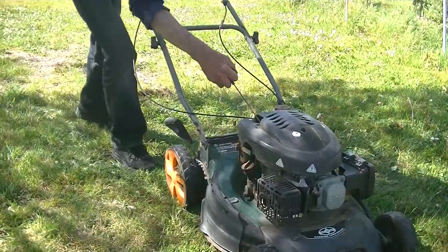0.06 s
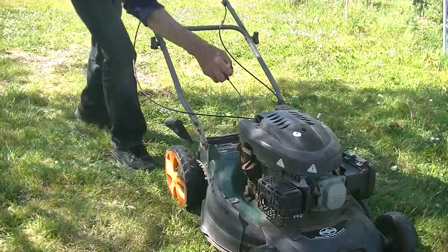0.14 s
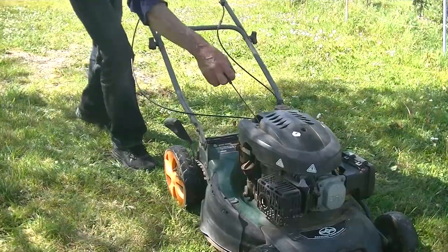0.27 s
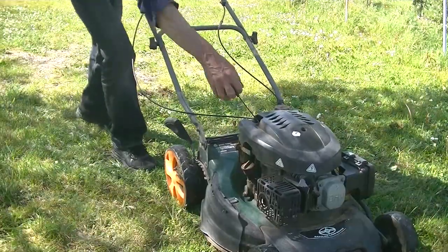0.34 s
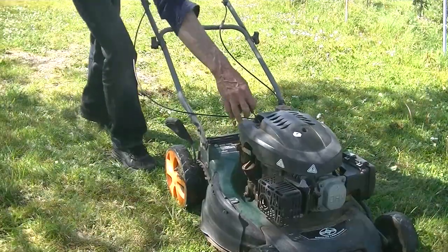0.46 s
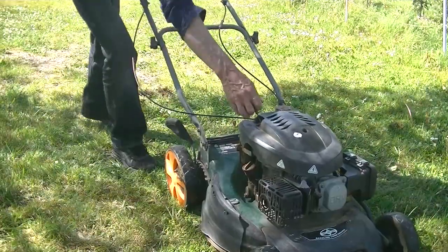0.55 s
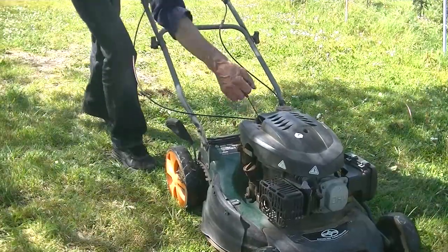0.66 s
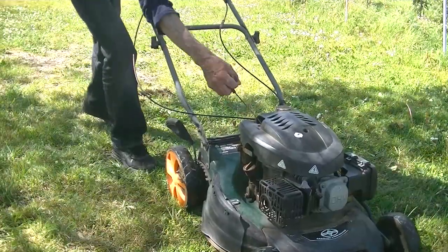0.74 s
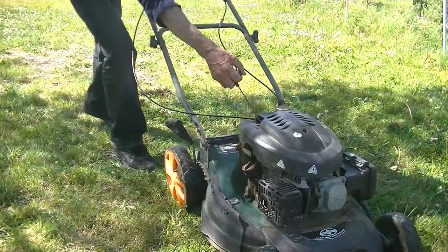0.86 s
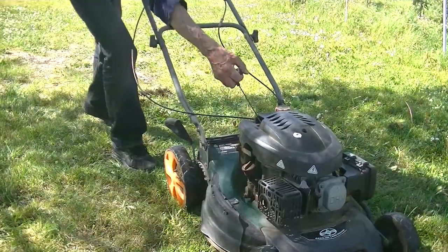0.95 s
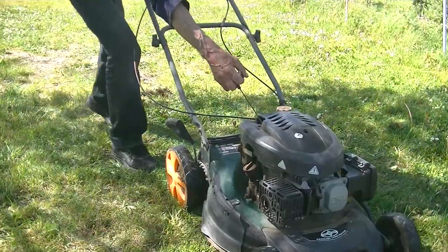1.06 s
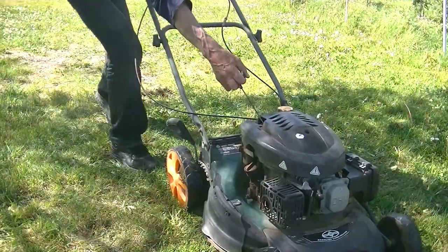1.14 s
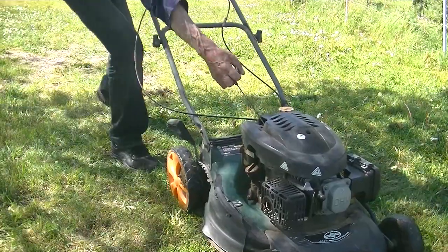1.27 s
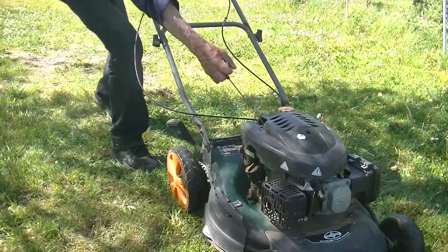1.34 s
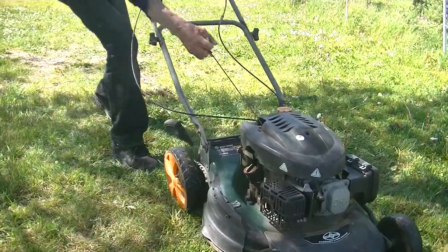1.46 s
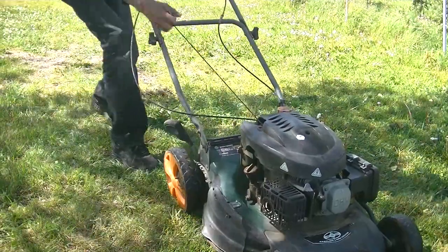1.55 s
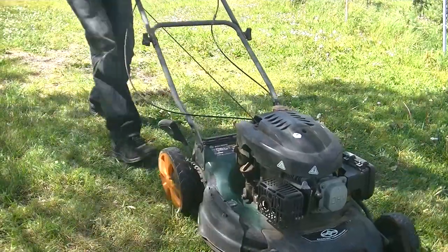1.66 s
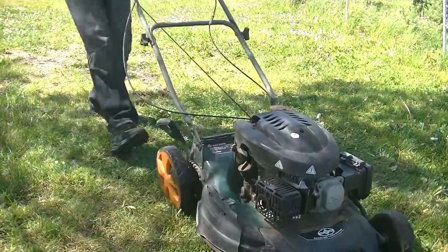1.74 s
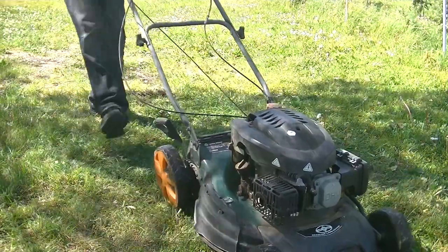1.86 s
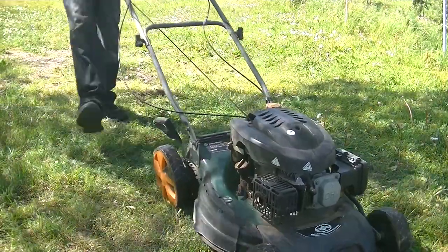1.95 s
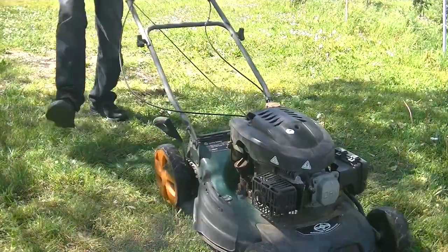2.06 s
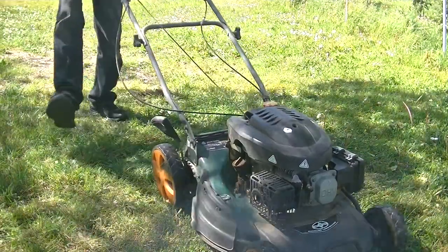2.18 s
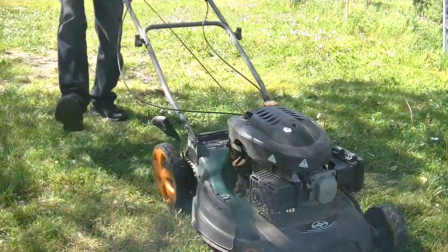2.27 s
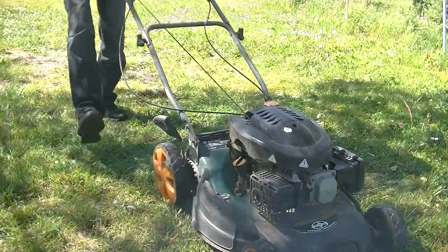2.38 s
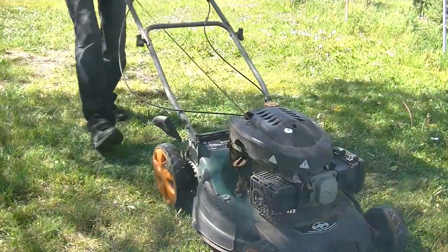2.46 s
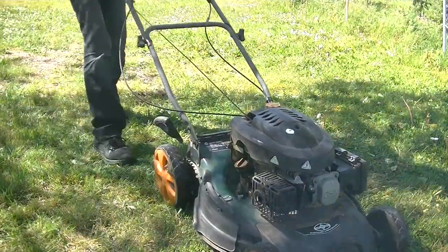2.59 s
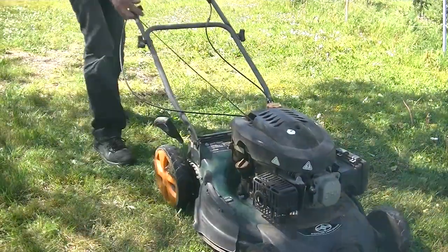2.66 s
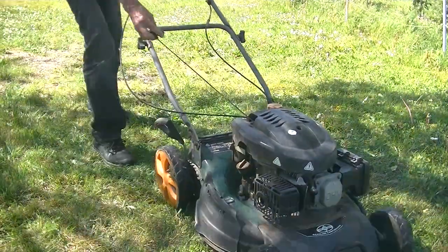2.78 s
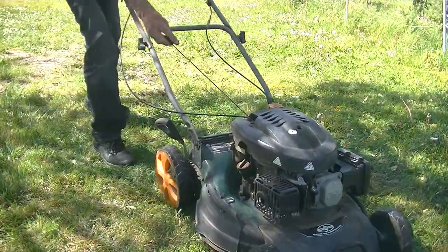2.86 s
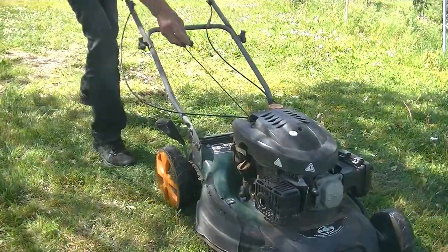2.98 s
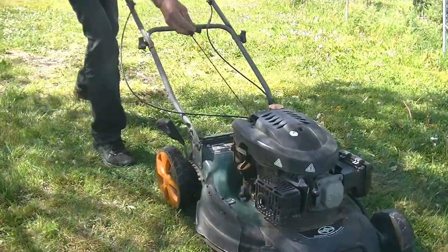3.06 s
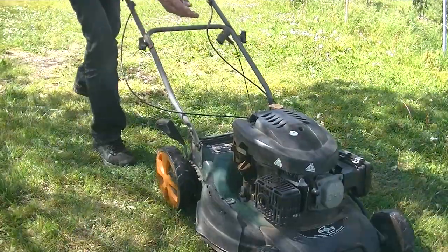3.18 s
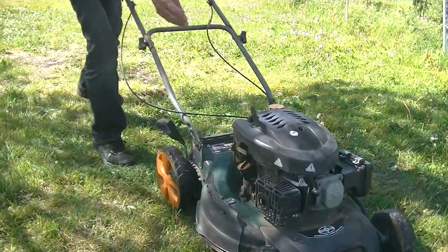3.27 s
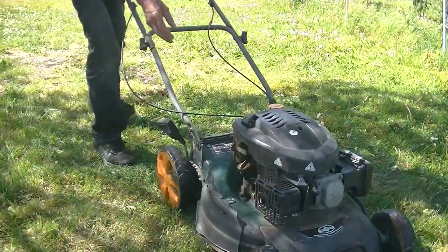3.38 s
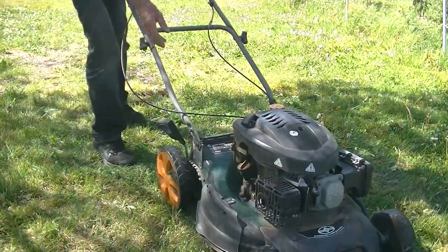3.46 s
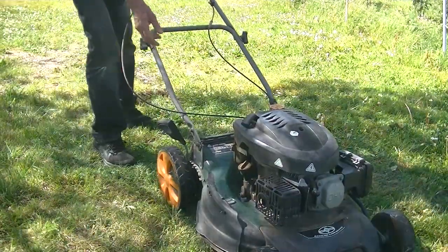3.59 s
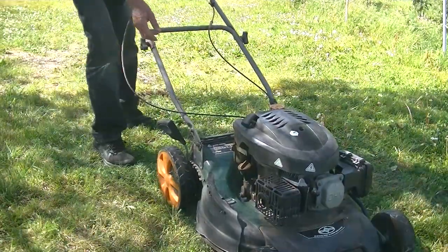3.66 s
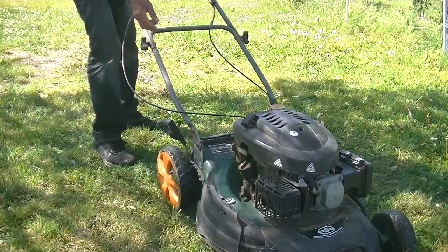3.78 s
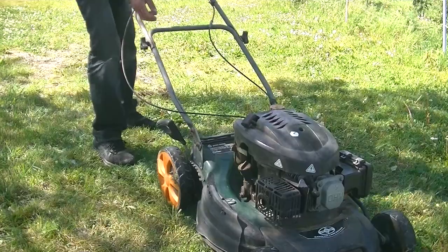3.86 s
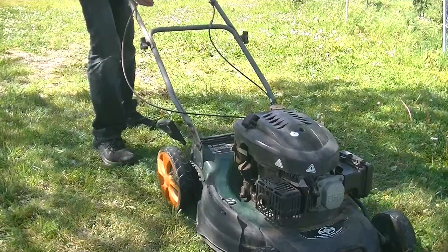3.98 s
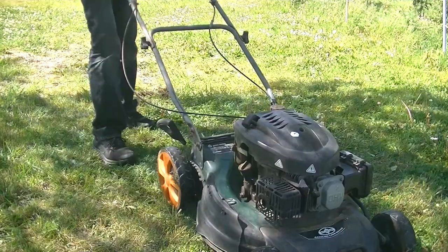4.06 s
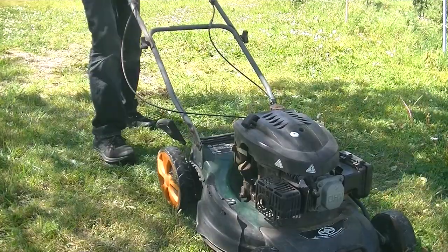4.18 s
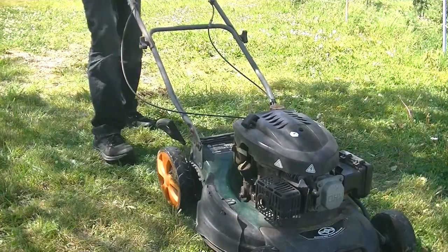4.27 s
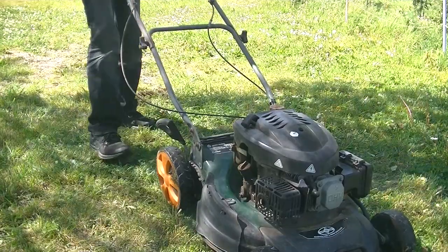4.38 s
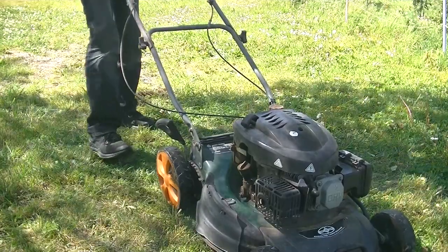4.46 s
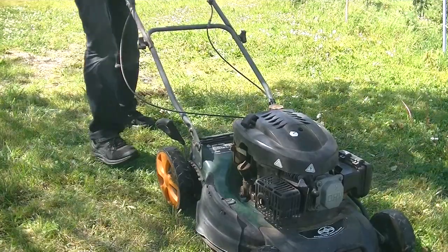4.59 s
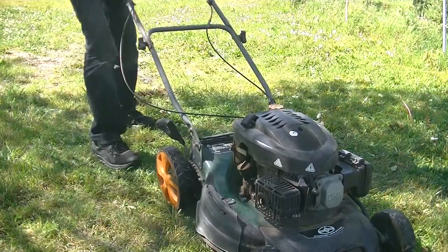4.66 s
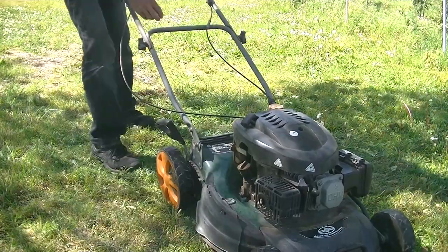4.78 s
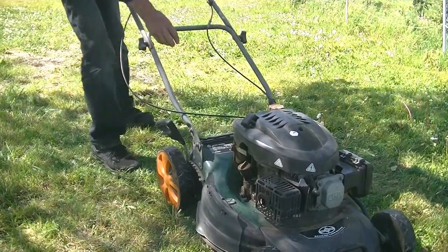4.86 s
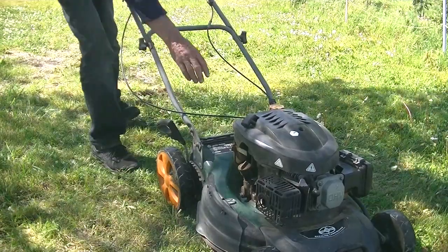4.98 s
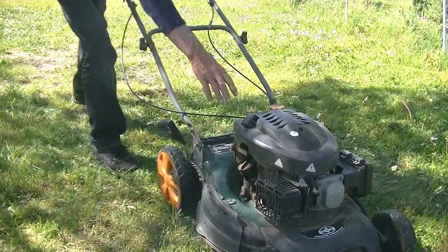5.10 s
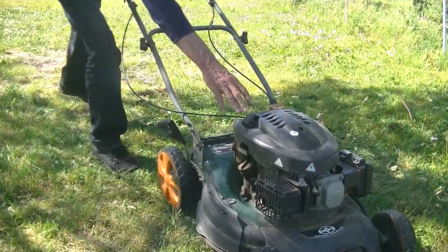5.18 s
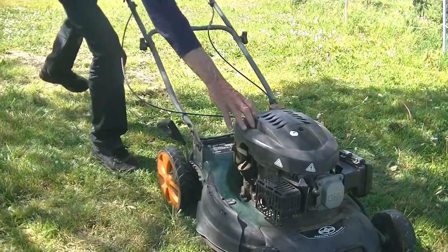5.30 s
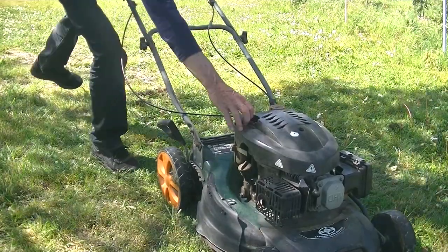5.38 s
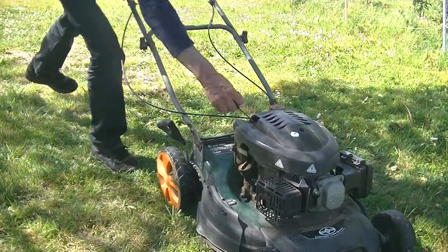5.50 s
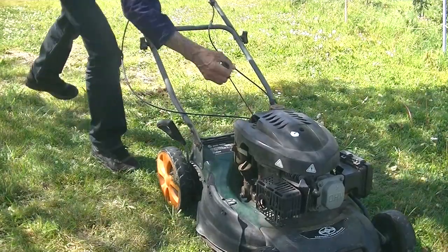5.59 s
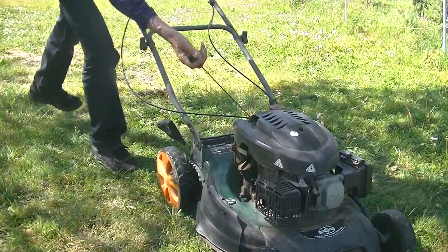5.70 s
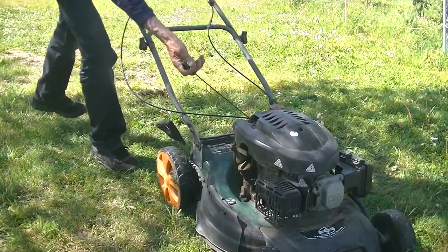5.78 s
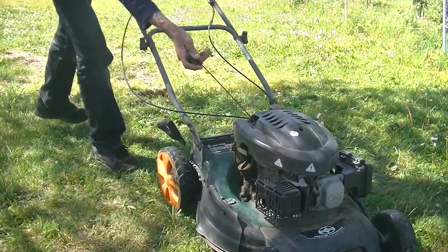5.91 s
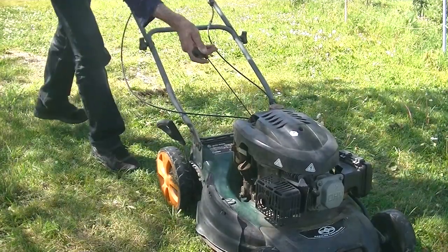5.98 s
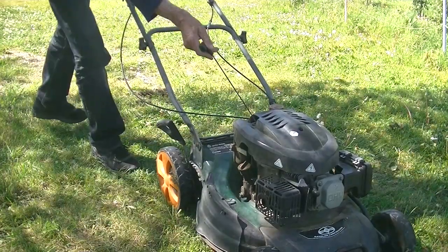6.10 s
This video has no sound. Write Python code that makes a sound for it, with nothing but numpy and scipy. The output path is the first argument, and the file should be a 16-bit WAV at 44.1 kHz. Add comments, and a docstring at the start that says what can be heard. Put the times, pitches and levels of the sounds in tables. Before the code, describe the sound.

A petrol lawn mower is started on a lawn, a couple of metres from the microphone. The starter clicks lightly, then the cord whizzes out and the engine catches, speeds up, stumbles briefly and settles into a fast, even beat with a metallic drone and clatter. The cord's handle slaps the frame, and near the end the spool gives a few high squeals over the running engine.

```python
"""A single-cylinder petrol lawn mower is pull-started on a lawn, a couple of metres away.
The starter's pawls (small catches) click as the slack is taken up, and the cord whizzes out. The engine
coughs, catches and settles at twenty firings a second: gas puffs boom through the muffler, the steel
deck over the blade drones, and each firing clacks. The spool rubs and squeals as the cord runs back in.
Behind it all is the faint hiss of the garden."""
import sys
import numpy as np
from scipy import signal
from scipy.fft import rfft, irfft, next_fast_len
from scipy.io import wavfile

SR = 44100
rng = np.random.default_rng(int(sys.argv[2]) if len(sys.argv) > 2 else 0)


def transcribe(u):
    """Save the signal u as a 16-bit wav file named by the first command-line argument.

    u: samples, shape (n,) or (channels, n), limited to [-1, 1]; the rate is SR.
    q: integer samples, one column per channel.
    """
    v = np.clip(np.atleast_2d(u).T, -1, 1)
    q = np.round(v * 32767).astype(np.int16)
    wavfile.write(sys.argv[1], SR, q)


N = 270893
T = np.arange(N) / SR

# how fast the engine runs; one cycle is two turns and one firing: (time [s], speed [cycles per s])
SPEED = [(1.4, 0), (1.785, 8.93), (1.884, 11.29), (2.183, 17.78), (2.362, 19.79), (3.427, 20.09),
         (5.806, 20.53)]
# notes at which the engine's cover and block ring: (pitch [Hz], width [Hz], level [dB])
COVER_NOTES = [(1142, 90, -4.5), (1573, 100, -0.5), (2545, 64, 0.5), (3450, 35, 1.5), (5227, 153, 5),
               (6440, 52, 4), (7610, 11, 9), (8080, 17, 10)]

CATCH_S = 1.785  # the first firing
MISFIRES = [10, 12, 14, 16]  # these cycles barely fire, as the throttle closes


def amp(db):
    """Turn decibels into a gain."""
    return 10 ** (np.asarray(db) / 20)


def unit(x):
    """Scale a signal to an average (rms) size of 1."""
    return x / np.sqrt(np.mean(x ** 2) + 1e-20)


def white():
    """Fresh white noise: an even hiss."""
    return rng.standard_normal(N)


def drift(per_s):
    """A random wobble of about size 1 that takes a new value per_s times a second."""
    return unit(np.interp(T * per_s, np.arange(N // 40), rng.standard_normal(N // 40)))


def in_time(rows):
    """Join a table's points in time with straight lines: one curve for each value column."""
    times, *columns = np.transpose(rows)
    return [np.interp(T, times, column) for column in columns]


def at_hz(points, hz):
    """Read between a table's frequencies, with every octave equally wide."""
    known, value = np.transpose(points)
    return np.interp(np.log(np.maximum(hz, 1)), np.log(known), value)


def colour(x, spectrum, size=8192):
    """Give a sound the tone of a (frequency [Hz], level [dB]) table; white noise keeps its level."""
    gain = unit(amp(at_hz(spectrum, np.fft.rfftfreq(size, 1 / SR))))
    cepstrum = irfft(np.log(gain))
    # fold it so that the filter rings only after a hit, never before (minimum phase)
    cepstrum[1:size // 2] *= 2
    cepstrum[size // 2 + 1:] = 0
    response = irfft(np.exp(rfft(cepstrum)))
    return signal.oaconvolve(x, response)[:N]


def resonate(x, hz, width):
    """Let through a band around one pitch; the narrower it is, the longer it rings."""
    r = np.exp(-np.pi * width / SR)
    feed = np.array([1, 0, -1]) * (1 - r * r) / 2
    feedback = [1, -2 * r * np.cos(2 * np.pi * hz / SR), r * r]
    return signal.lfilter(feed, feedback, x + 1e-18)


def ring(x, hz, width):
    """Ring at one pitch, boosted so that white noise keeps its level."""
    return resonate(x, hz, width) * np.sqrt(SR / (np.pi * width))


def housing(x, notes):
    """A housing adds its own ringing notes to whatever rattles inside."""
    return x + sum(amp(db) * resonate(x, hz, width) for hz, width, db in notes)


def bursts(times, levels_db, rise_s, decay_s):
    """Noise that swells up to each hit and dies away after it."""
    power = np.zeros(N)
    for s, db in zip(times, levels_db):
        end = s + min(8 * decay_s + .01, .1)
        near = slice(max(int((s - .02) * SR), 0), max(int(end * SR), 0))
        age = T[near] - s
        power[near] += (amp(db) * np.exp(np.minimum(age / rise_s, -age / decay_s))) ** 2
    return np.sqrt(power) * white()


def engine_cycles():
    """Cycles run since the first firing, at every sample."""
    speed, = in_time(SPEED)
    return np.cumsum(speed * (T > CATCH_S)) / SR


def cycle_times(share):
    """The moments when the engine is a given share through its cycle; 0 is the firing."""
    cycles = engine_cycles()
    return T[np.searchsorted(cycles, np.arange(share, cycles[-1], 1), side="right")]


def at_speed(full_db, power):
    """Level in dB of a part that grows with engine speed, more steeply for a higher power."""
    speed, = in_time(SPEED)
    return full_db + power * 20 * np.log10(speed / speed.max() + 1e-6)


def throttle(s, ease_at_s=2.32, close_s=.068):
    """1 (wide open) while the engine speeds up, falling to 0 as its speed governor eases it back."""
    return np.exp(-np.maximum(s - ease_at_s, 0) / close_s)


def settling(s, db, open_db, fade_db_per_s):
    """A level in dB that is higher at open throttle and sinks slowly as the engine runs on."""
    return db + open_db * throttle(s) - fade_db_per_s * np.maximum(s - CATCH_S, 0)


def lull():
    """A gain that drops just after each firing and builds up towards the next."""
    cycles = engine_cycles()
    depth_db = settling(T, 6.5, open_db=9.5, fade_db_per_s=.74) * np.minimum(cycles / 2, 1)
    dip = np.exp(-((cycles % 1 - .17) / .14) ** 2)
    return amp(depth_db * (.2 - dip))


def friction(repeat_share):
    """Rubbing noise; once the engine runs, a share of it comes back alike in every cycle."""
    pattern = rng.standard_normal(SR // 20)
    place = (engine_cycles() % 1 * len(pattern)).astype(int)
    running = np.sqrt(repeat_share) * pattern[place] + np.sqrt(1 - repeat_share) * white()
    return np.where(T > CATCH_S, running, white())


def garden():
    """A faint, steady outdoor hiss, a little different in each ear."""
    # tone of the hiss: (frequency [Hz], level [dB])
    hiss_tone = [(18, -61), (30, -31), (90, -30), (127, -16.5), (280, -5), (311, -3), (632, -4.5),
                 (702, -6), (1350, -5.5), (2900, 2), (5590, -8), (6720, -11), (9220, -17), (14000, -28.5),
                 (16000, -22)]
    middle = colour(white(), hiss_tone)
    sides = amp(-7.5) * colour(white(), hiss_tone) * [[1], [-1]]
    return amp(-62.5) * (middle + sides)


def pawls(scatter_db=6, chatter_knock_db=-24, chatter_tick_db=-2.5):
    """The starter's catches drop into their cup: a ringing click, a hollow knock and a bright tick."""
    # clear clicks: (time [s], level [dB], knock offset [dB], tick offset [dB])
    clear_clicks = [(0.071, -36.5, -8, -35), (0.129, -37, -13, -32), (0.198, -40, -9, -30),
                    (0.303, -37, -30, -13), (0.759, -28, -35, 2.5), (0.764, -34, -45, -20),
                    (0.836, -40, -5, -35), (1.123, -41.5, -21, -22), (1.218, -44.5, -24, -27),
                    (1.379, -39.5, -14, -28), (1.652, -28.5, -24, -24), (1.671, -26, -13.5, -29),
                    (1.74, -27, -29, -9), (1.761, -19, -20, -16), (1.816, -24, -24, -25),
                    (1.87, -23, -26, 0)]
    # lighter chatter in between: (start [s], end [s], rate [clicks per s], level [dB])
    chatter = [(0.362, .4, 28, -47.5), (.712, .745, 53, -38.5), (0.982, 1.35, 17.2, -51.5),
               (1.702, 1.73, 55, -33.5), (1.826, 1.915, 87, -30.5)]
    # tone of a click: (frequency [Hz], level [dB])
    click_tone = [(100, -50), (220, -25), (380, -4.5), (650, -15.5), (1100, -6.5), (1600, -6.5), (2600, 0),
                  (3700, 0.5), (4800, -1), (5800, -14.5), (6800, -7), (9000, -36), (14000, -30)]
    # notes at which the cup rings: (pitch [Hz], width [Hz], level [dB])
    cup_notes = [(1597, 91, 10), (2175, 240, 0.5), (3760, 120, 4.5), (4270, 180, 4)]
    clicks = list(clear_clicks)
    for start, end, per_s, db in chatter:
        chance = rng.uniform(-1.04, 1, size=(16, 2))
        for s, (early, strong) in zip(np.arange(start + .5 / per_s, end, 1 / per_s), chance):
            when = s - .25 * early / per_s
            clicks.append((when, db + scatter_db * strong, chatter_knock_db, chatter_tick_db))
    times, db, knock_db, tick_db = np.transpose(clicks)
    click = bursts(times + .0011, db - 9, rise_s=.0011, decay_s=.0064)
    tail = bursts(times + .008, db - 23, rise_s=.0025, decay_s=.024)
    knock = bursts(times + .0025, db + knock_db - 2.5, rise_s=.00075, decay_s=.0088)
    knock = resonate(ring(knock, hz=1130, width=100), hz=1200, width=1400)
    tick = bursts(times + .00082, db + tick_db - 15.5, rise_s=.00056, decay_s=.011)
    tick = colour(tick, [(300, -71), (3000, -14), (7000, 9), (10000, -3), (15000, -18)])
    return housing(colour(click + tail, click_tone), cup_notes) + knock + tick


def spool_squeal(build_s=.015, flutter_db=2.5, ring_periods=115, slips_per_s=52):
    """The cord's spool sticks and slips: each slip screeches, and its notes build up and ring on."""
    # when the spool rubs: (start [s], end [s], level [dB])
    rubs = [(0.731, 0.742, -47), (1.903, 1.954, -35), (3.33, 3.355, -43.5), (5.51, 5.569, -34.5),
            (5.61, 5.697, -36), (5.728, 5.761, -35), (6.06, 6.084, -36.5)]
    # narrow notes at which it sings: (pitch [Hz], width [Hz], level [dB])
    singing_notes = [(2718, 10, -3), (2880, 10, 0), (2968, 20, -6), (3128, 14, -2), (6732, 30, -8),
                     (6847, 12, -8), (9678, 14, -9)]
    # broad notes set off by each slip: (pitch [Hz], width [Hz], level [dB])
    screech_notes = [(3120, 150, -23), (6570, 180, -3), (9550, 160, -11), (9620, 230, -5),
                     (13020, 160, -11.5), (14500, 540, -17)]
    rubbing = sum(amp(db) * ((T > start) & (T < end)) for start, end, db in rubs)
    drive = sum(amp(db) * np.clip((T - start) / build_s, 0, 1) * (T < end) for start, end, db in rubs)
    song, log_drive = 0, np.log(drive + 1e-9)
    for hz, width, db in singing_notes:
        fall = T * hz / ring_periods  # low notes ring longest
        held = np.exp(np.maximum.accumulate(log_drive + fall) - fall)  # follows the rub, then fades
        wander = np.cumsum(white()) * np.sqrt(2 * np.pi * width / SR)  # makes the note less pure
        song += held * amp(db + flutter_db * drift(90)) * np.sin(2 * np.pi * hz * T + wander)
    slips = np.cumsum(rng.uniform(.4, 1.3, size=600)) / slips_per_s
    first_slips = np.array(rubs)[:, 0] + .002  # every rub breaks loose with a slip
    slips = np.append(slips[slips < T[-1]], first_slips)
    scrape = rubbing * bursts(slips, rng.normal(3.5, 2, len(slips)), rise_s=.0005, decay_s=.007)
    screech = sum(amp(db) * resonate(ring(scrape, hz, width), hz, 3 * width)
                  for hz, width, db in screech_notes)
    return amp(-2) * song + amp(-4) * screech


def thumps(kick_db=-42.5, misfire_db=-38, misfire_lag_s=.01):
    """The starter, the first three firings and the misfires shake a low note out of the deck."""
    # low thumps as the starter catches and the pull turns the engine over: (time [s], level [dB])
    starter_thumps = [(0.762, -49.5), (1.602, -52), (1.742, -41)]
    fired = cycle_times(0)
    kicks = [(s, kick_db) for s in fired[:3]]
    stumbles = [(s + misfire_lag_s, misfire_db) for s in fired[MISFIRES]]
    times, db = np.transpose(list(starter_thumps) + kicks + stumbles)
    shake = bursts(times, db, rise_s=.002, decay_s=.009)
    thud = colour(shake, [(40, -25), (130, -26), (235, 3.5), (330, 14.5),
                          (500, -9), (900, 9), (2500, -39)])
    note = resonate(ring(shake, hz=249, width=70), hz=248, width=170)
    return amp(-4.5) * thud + amp(-6.5) * note


def cranking_puffs(start_s=1.428, gap_s=.05, first_db=-54, step_db=1):
    """Three short puffs, each a little stronger, as the pull first turns the engine over."""
    # tone of a puff: (frequency [Hz], level [dB])
    puff_tone = [(120, -33), (230, -12), (340, 6), (550, -3.5), (900, 0.5), (1500, -10), (3000, -30)]
    k = np.arange(3)
    puffs = bursts(start_s + gap_s * k, first_db + step_db * k, rise_s=.002, decay_s=.008)
    return colour(puffs, puff_tone)


def cord_whizz():
    """The cord whizzes through its guide hole, rising in pitch as the pull gathers speed."""
    # the whizz: (time [s], pitch [Hz], level [dB])
    whizz = [(1.5, 1197, -90), (1.55, 1450, -60), (1.6, 1650, -57), (1.635, 2240, -47), (1.66, 2300, -110)]
    hz, db = in_time(whizz)
    rough_hz = hz * (1 + .017 * drift(600))
    return amp(db) * np.sin(2 * np.pi * np.cumsum(rough_hz) / SR)


def exhaust(lead_s=.0032, jitter_s=.00064, uneven_db=.6):
    """The gas puffs of each cycle boom through the muffler."""
    # puffs within a cycle: (place [share of the cycle], level [dB])
    puffs = [(.0, 5), (.5, -16)]
    # tone of the muffler: (frequency [Hz], level [dB])
    muffler_tone = [(25, -50), (60, -50), (82, -19), (102, -14), (122, -8), (143, -10.5), (163, 3),
                    (190, -1), (225, 4.5), (280, -11.5), (400, 3), (900, -58.5)]
    pulses = np.zeros(N + SR)
    for share, db in puffs:
        times = cycle_times(share) - lead_s
        at = (rng.normal(times, jitter_s) * SR).astype(int)
        pulses[at] += amp(rng.normal(db, uneven_db, len(at)))
    return amp(at_speed(-62.5, power=1.3)) * unit(colour(pulses[:N], muffler_tone))


def drone_change(step_db, start_s=3.857, rise_s=.087, creep_db_per_s=.55):
    since = np.maximum(T - start_s, 0)
    duck_db = 4 * np.exp(-((T - 5.64) / .13) ** 2)  # at a set time
    return step_db * np.minimum(since / rise_s, 1) + creep_db_per_s * since - duck_db


def deck(throb_db=.5, hum_db=-49):
    """The steel deck drones as the engine turns and is jolted by each firing."""
    # tone of its low rumble: (frequency [Hz], level [dB])
    rumble_tone = [(30, -66), (120, -24.5), (220, -28.5), (310, -1.5), (400, 1), (490, 1), (620, -4),
                   (800, -15.5), (1500, -36.5)]
    # tone of its ringing steel: (frequency [Hz], level [dB])
    steel_tone = [(300, -50.5), (650, -2.5), (850, 1.5), (1150, 4), (1400, 2.5), (1650, -2.5), (2100, -3.5),
                  (3500, -32.5)]
    # notes that follow the engine: (pitch [times the firing rate], level within the hum [dB])
    hum_notes = [(12, -10.5), (16, -17), (19, -14), (24, -12), (28, -9.5), (32, -15)]
    cycles, fired = engine_cycles(), cycle_times(0)
    rumble_db = at_speed(-53, power=1.25) + drone_change(step_db=3)
    steel_db = at_speed(-50, power=1) + drone_change(step_db=5.5)
    sway = lull() * amp(throb_db * np.cos(4 * np.pi * (cycles + .18)))  # one throb for each turn
    jolt_db = rng.normal(4 + 8 * throttle(fired), 1.6)  # hardest while the engine speeds up
    jolts = bursts(fired - .0025, jolt_db, rise_s=.001, decay_s=.0025)
    rumble = amp(rumble_db) * colour(sway * friction(repeat_share=.45) + amp(2.5) * jolts, rumble_tone)
    boom = amp(rumble_db - 5.5) * resonate(ring(jolts, hz=263, width=42), hz=260, width=110)
    hum = sum(amp(db + drift(4.7)) * np.sin(2 * np.pi * (k * cycles + rng.random()))
              for k, db in hum_notes)
    hum *= amp(hum_db) * np.clip(cycles - 5, 0, 1)  # comes in after five cycles
    steel = amp(steel_db) * colour(sway * friction(repeat_share=.35) + jolts, steel_tone)
    return rumble + boom + hum + housing(steel, COVER_NOTES)


def whir(grain_db=1.55, uneven_db=.3):
    """Gears and fan whir while the parts that work the valves tick in every cycle."""
    # valve knocks: (place [share of the cycle], level over the whir [dB], decay [s])
    valve_knocks = [(.41, 6.5, 0.0008), (.55, 1.5, 0.0022), (.83, -12, 0.0023), (.96, -3, 0.0097)]
    # tone of the whir: (frequency [Hz], level [dB])
    whir_tone = [(500, -34), (1300, -9), (2000, 0), (2600, 0), (3000, 1), (3700, 3), (4400, 4), (5200, -10),
                 (5750, -15.5), (6700, -5.5), (7900, -13), (9000, -19.5), (11800, -29), (15000, -24.5)]
    rattle = friction(repeat_share=.43) * amp(grain_db * drift(500)) * lull()
    for share, db, decay_s in valve_knocks:
        times = cycle_times(share)
        rattle += bursts(times, rng.normal(db, uneven_db, len(times)), rise_s=.00039, decay_s=decay_s)
    return housing(amp(at_speed(-41, power=1)) * colour(rattle, whir_tone), COVER_NOTES)


def firing_clacks(misfire_drop_db=9, ping_scatter_db=7):
    """Every firing gives a clack with a hard metal snap at its core; some set off a clear ping."""
    # tone of the clack: (frequency [Hz], level [dB])
    clack_tone = [(150, -33), (400, -3.5), (1000, -8.5), (2200, 2), (3700, 4.5), (4600, 6.5), (5700, -9.5),
                  (6900, 3), (8000, -4.5), (9000, -32), (10400, -8.5), (11800, -27), (13500, -19),
                  (16000, -25)]
    # tone of the snap: (frequency [Hz], level [dB])
    snap_tone = [(500, -23), (2500, 1.5), (4400, 5.5), (5700, -21.5), (7200, 0.5), (10000, -6),
                 (11800, -14), (14000, -6.5), (16000, -19)]
    fired = cycle_times(0)
    force_db = settling(fired, -26.5, open_db=.5, fade_db_per_s=1) + rng.normal(0, 1, len(fired))
    force_db[MISFIRES] -= misfire_drop_db
    clack = bursts(fired - .0004, force_db - .5, rise_s=.001, decay_s=.0041)
    snap_db = force_db + settling(fired, -6, open_db=3.5, fade_db_per_s=1.7)
    snap = bursts(fired, snap_db, rise_s=.00043, decay_s=.002)
    ping_db = force_db - 14.5 + ping_scatter_db * rng.uniform(-1, 1, len(fired))
    ping = ring(bursts(fired, ping_db, rise_s=.0005, decay_s=.002), hz=4410, width=180)
    return ping + housing(colour(clack, clack_tone) + colour(snap, snap_tone), COVER_NOTES)


def far_side_rattle():
    """Rattle leaves the far side of the engine by other paths, unlike in each ear, widening the sound."""
    # tone of those paths: (frequency [Hz], level [dB])
    path_tone = [(100, 0), (400, -24), (1500, -17), (2400, -21), (4400, -17), (8000, -8), (15000, -5)]
    return amp(-9.5) * colour(whir() + firing_clacks(), path_tone) * [[1], [-1]]


def handle_slaps():
    """The cord's handle slaps the frame, with a short ring each time."""
    # the slaps: (time [s], level [dB], decay [s])
    slaps = [(3.335, -50, .004), (3.355, -22.5, .001), (3.382, -26.5, 0.0049), (3.405, -49, 0.0061)]
    hits = sum(bursts([s], [db], rise_s=.00075, decay_s=decay_s) for s, db, decay_s in slaps)
    return ring(hits, hz=1910, width=160)


def microphones(x):
    """Two close microphones hear the mower with a balance and a lag that change with frequency."""
    # how much louder the left is: (frequency [Hz], left minus right [dB])
    balance = [(100, -0.5), (500, -1), (1100, -1), (1800, -1), (2800, -4.5), (4200, -4), (5200, -4),
               (6500, 10.5), (8000, 10), (9800, -10), (15000, 1.5)]
    # how far the left is ahead: (frequency [Hz], phase [radians])
    left_lead = [(0, 0), (4650, 0.056), (5510, 1.55), (5940, 1.6), (6200, -0.3), (6800, 0.1), (7670, -0.5),
                 (8350, -1.5), (9390, -2), (10800, 0.5), (12700, -1.5), (13500, -0.24), (14500, -0.3),
                 (16200, 0.1)]
    size = 2 * next_fast_len(N // 2 + SR // 10)
    hz = np.fft.rfftfreq(size, 1 / SR)
    left = amp(at_hz(balance, hz) / 2) * np.exp(.5j * at_hz(left_lead, hz))
    right = 1 / left
    pair = np.array([left, right]) / np.maximum(abs(left + right) / 2, .5)
    return irfft(rfft(x, size) * pair)[:, :N]


def scene():
    """The mower over the faint hiss of the garden."""
    starting = pawls() + spool_squeal() + thumps() + cranking_puffs() + cord_whizz()
    engine = exhaust() + deck() + whir() + firing_clacks()
    return garden() + microphones(starting + engine + handle_slaps()) + far_side_rattle()


def record(dry, ceiling=.3, cutoff_hz=16000):
    """The hardest peaks are slightly rounded and the highest treble is cut steeply."""
    rounded = ceiling * np.tanh(dry / ceiling)
    return signal.sosfilt(signal.ellip(10, .1, 80, cutoff_hz, fs=SR, output="sos"), rounded)


dry = scene()
out = record(dry)
transcribe(out)
```